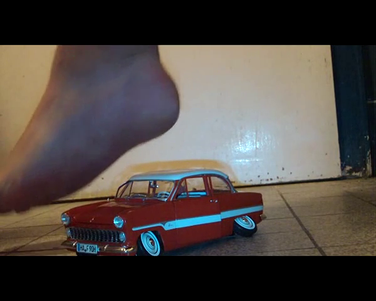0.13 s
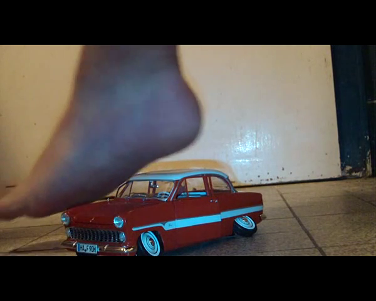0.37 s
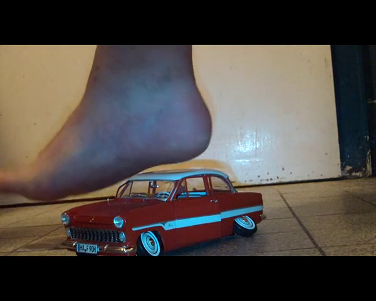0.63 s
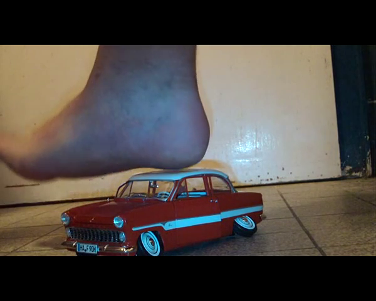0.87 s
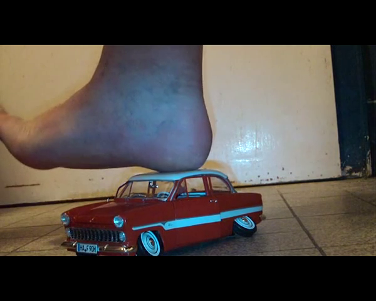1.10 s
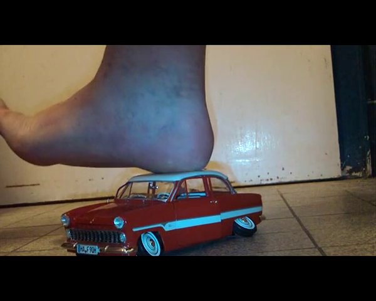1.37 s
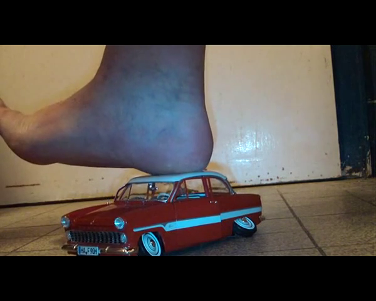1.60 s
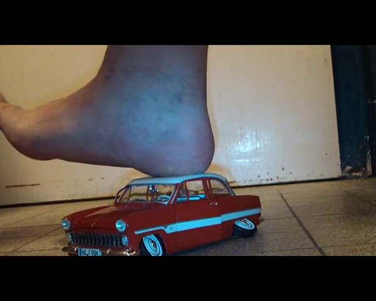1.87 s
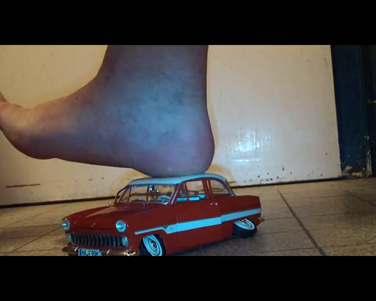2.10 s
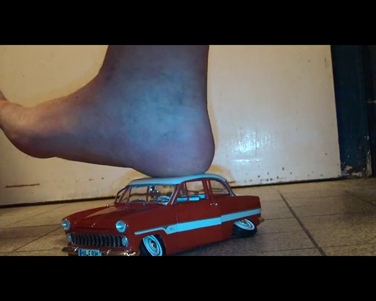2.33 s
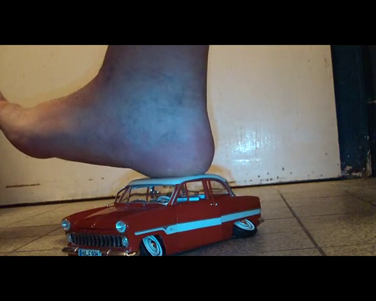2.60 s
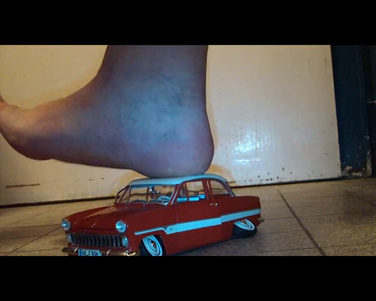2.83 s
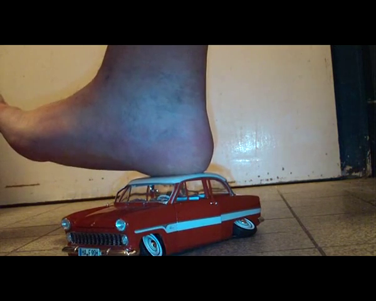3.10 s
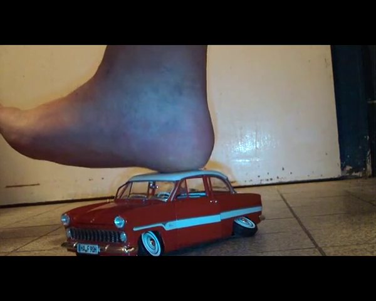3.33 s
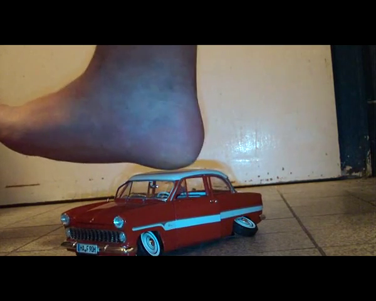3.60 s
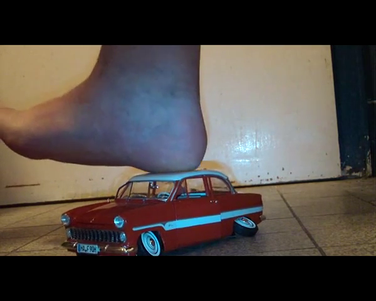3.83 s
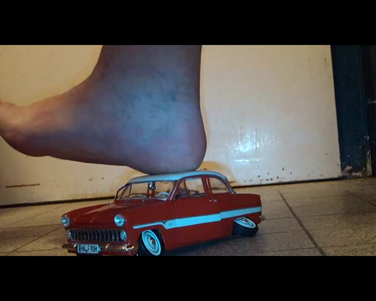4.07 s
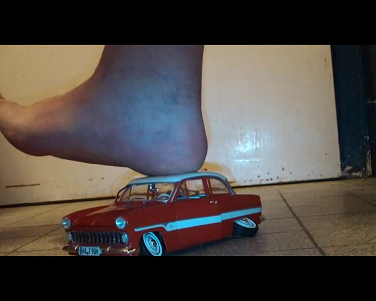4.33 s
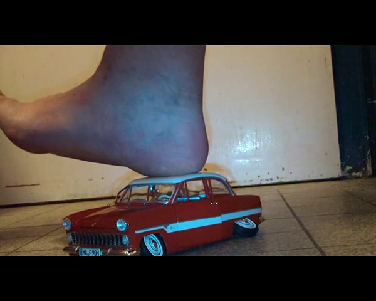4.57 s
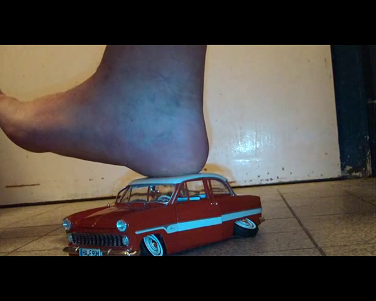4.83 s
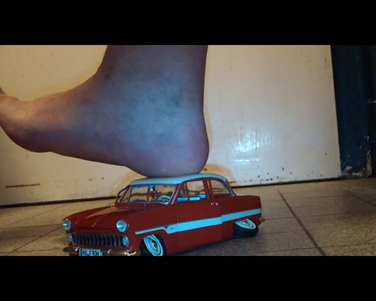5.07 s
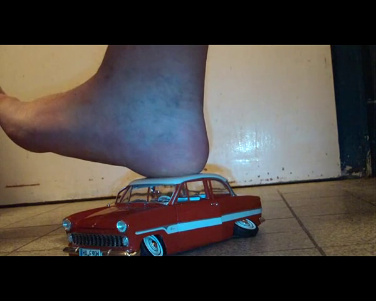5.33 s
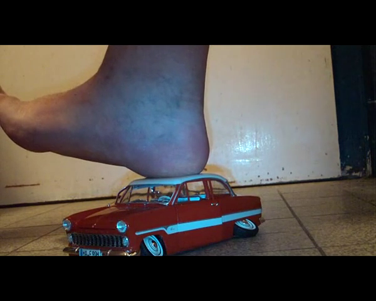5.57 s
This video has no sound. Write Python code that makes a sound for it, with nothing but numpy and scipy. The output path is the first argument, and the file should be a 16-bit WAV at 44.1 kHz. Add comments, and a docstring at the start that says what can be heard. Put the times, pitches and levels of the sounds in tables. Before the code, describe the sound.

Over faint rumble and hiss, a small metal toy car cracks sharply under a bare heel, with scattered ticks and creaky crackles between the louder snaps.

```python
"""A soft low rumble and hiss come first, filtered from noise, with a very faint steady whine.
After about a second, cracks begin: a bare heel presses on the roof of a die-cast toy car on a tiled floor,
close to a small microphone. Joints slip in bursts of tiny breaks that ring the hollow shell.
The small hard room answers with echoes and a short tail.
Some of the louder cracks also push the microphone's baseline off for a moment."""
import sys
import numpy as np
from scipy import signal
from scipy.fft import rfft, irfft, next_fast_len
from scipy.io import wavfile
from scipy.ndimage import uniform_filter1d, map_coordinates

SR = 44100
rng = np.random.default_rng(int(sys.argv[2]) if len(sys.argv) > 2 else 0)


def generate_wav(sig):
    """Save sig (samples, or channels by samples) to the path in sys.argv[1] as 16-bit PCM at SR."""
    pcm = np.round(np.clip(np.atleast_2d(sig).T, -1, 1) * 32767).astype(np.int16)
    wavfile.write(sys.argv[1], SR, pcm)


def convert_level_to_amplitude(level_db):
    """Map a level in decibels to its linear amplitude factor."""
    exponent = np.asarray(level_db, float) / 20
    return 10 ** exponent


N = 250929  # length in samples

# how loud the background is over time: start_s, rumble_db (before it wavers), hiss_db (before it wavers)
FLOOR_LEVELS = [(0.0, -57, -59.5), (0.54, -59.5, -60.5), (1.0, -56.5, -61.5), (1.55, -58.5, -59.5),
                (1.921, -54, -58), (2.251, -58, -60.5), (5.69, -54.5, -58.5)]
# tone of the rumble, only its shape counts: pitch_hz, level_db
RUMBLE_COLOUR = [(12, -59), (20, -4.5), (57, 3), (76, -5), (107, -3), (145, -3.5), (316, -7.5),
                 (600, -12.5), (780, -48.5), (1320, -120)]
# tone of the hiss, only its shape counts: pitch_hz, level_db
HISS_COLOUR = [(240, -50.5), (400, -14.5), (490, -20), (654, -6), (2500, -13), (3060, -12.5), (7000, -15),
               (9100, -32.5), (15400, -120)]
# one electrical whine: pitch_hz, level_db (rms)
WHINE_TONE = (7854, -93)
# every slip of a joint, and the rattles as the car rocks just after the first crack (1.012, 1.025, 1.039 s):
# start_s, strength_db (before a boost shared by all), part_hz and part_db (ring of the part that gives way),
# brightness_db, slip_ms
CRACK_LIST = [(0.986, -17.5, 3020, -17, 0, 3.1), (.987, 1, 778, 4, 14, 11), (1.012, -17, 800, 17, -12, 3.9),
              (1.025, -23, 800, 1, 4.5, 6.6), (1.039, -20, 888, 11.5, -9, 4.3),
              (1.651, -28.5, 902, -5, -9, 8.1), (1.668, -26, 920, -1, 2, 5.7),
              (1.728, -28, 1030, 1, -7, 9.5), (1.829, -14, 3400, -7, 11, 6.6),
              (1.841, -12, 1503, 2, 3, 4.2), (1.898, 0.5, 1163, -5.5, 4, 3),
              (2.387, -31, 3200, -8.5, 14.5, 7.5), (2.661, -5.5, 2720, 3, 2.5, 3.95),
              (3.171, -39.5, 1410, 3.5, 11, 34), (3.267, -37.5, 1123, 5, -21.5, 8),
              (3.285, -2.5, 3260, -2, 4.5, 2.73), (3.382, -11, 400, 14, 0, 11.3),
              (3.837, -30, 1350, 4, 5.5, 7.2), (4.084, -36, 970, 6, -6.5, 7.2),
              (4.193, -23, 1015, 0, -2, 7.8), (4.266, -28, 1100, -1, -9, 6.8),
              (4.338, -28, 1010, -5, -9.5, 9), (4.47, -27, 1120, 10, -1, 11.8),
              (4.495, -9.5, 990, -9, -7, 4.1), (5.168, -38, 4740, -12, 6, 34),
              (5.627, -3.5, 1910, -9, 3, 3.1)]
# ways the car's shell can ring: pitch_hz, level_db (before scatter), t60_s (time to fall by 60 dB)
SHELL_MODES = [(400, 3, 0.013), (554, -11, 0.063), (694, 0.5, 0.018), (767, -12, 0.079), (814, -7.5, 0.069),
               (995.5, -2.5, 0.04), (1285, 3, 0.013), (1440, 1.5, 0.017), (1887, -0.5, 0.011),
               (3360, -17, 0.0024), (2720, -3, 0.005), (3760, -4, 0.0085), (4393, -1.5, 0.0069),
               (5483, 6.5, 0.0067)]
# tone of a crack of strength 0 dB and brightness 0 dB: pitch_hz, level_db,
# gain_per_brightness (dB for each dB), gain_per_strength (dB for each dB)
CRACK_COLOUR = [(224, -42.5, 0.16, -0.1), (414, -31, -0.34, 1.02), (800, -10.5, 0.29, 0.65),
                (1540, -10, 0.63, 0.49), (3200, -12.5, 1.17, 0.37), (4256, -18, 1.03, 0.65),
                (6000, -24, 1.87, 0.42)]
# first echoes: delay_ms, level_db (before the treble loss)
WALL_ECHOES = [(4.5, -3.5), (9.6, -7.5), (22, -10.5)]
# how the room dies away in each band: pitch_hz, t60_s, level_db
ROOM_BANDS = [(316, 0.22, 7.5), (790, 0.3, 3), (1380, 0.29, -7), (2010, 0.28, -7), (3757, 0.29, -4),
              (5476, .26, -2.5)]
# pushes on the baseline: start_s, depth_share (of full scale, before smoothing), recovery_ms
JOLT_LIST = [(0.989, -0.11, 52), (1.835, 0.029, 44), (1.9, -0.091, 34), (3.285, -0.057, 21),
             (3.386, -0.022, 41), (4.499, 0.026, 43), (5.631, -0.051, 54)]
# upper limit of the microphone: pitch_hz, level_db
MIC_LIMIT = [(6800, 3), (7200, -9), (7500, -25), (8000, -33.5), (9000, -66)]


def unit(x):
    """Scale x to an rms of 1."""
    return x / np.sqrt(np.mean(x ** 2) + 1e-20)


def along(at, values, hz):
    """Join points with straight lines on a logarithmic pitch axis."""
    return np.interp(np.log(hz + 1), np.log(np.asarray(at) + 1), values)


def coloured(x, at, db):
    """Filter x to the given levels without letting any sound arrive early (minimum phase)."""
    size = next_fast_len(len(x) + 4096)
    level_db = along(at, db, np.fft.rfftfreq(size, 1 / SR))
    cepstrum = irfft(np.log(convert_level_to_amplitude(level_db)), size)
    # folding the second half onto the first makes the filter causal
    cepstrum[1:size // 2] *= 2
    cepstrum[size // 2 + 1:] = 0
    response = np.exp(rfft(cepstrum))
    return irfft(rfft(x, size) * response, size)[:len(x)]


def wobble(rate_hz):
    """A smooth random curve through rate_hz random points a second."""
    points = rng.standard_normal(int(N * rate_hz / SR) + 4)
    return map_coordinates(points, [np.arange(N) * rate_hz / SR])


def floor():
    """Low room rumble and microphone hiss: filtered noise whose levels follow a table and waver."""
    start_s, rumble_db, hiss_db = np.transpose(FLOOR_LEVELS)
    t = np.arange(N) / SR
    rumble = unit(coloured(rng.standard_normal(N), *np.transpose(RUMBLE_COLOUR)))
    hiss = unit(coloured(rng.standard_normal(N), *np.transpose(HISS_COLOUR)))
    rumble *= convert_level_to_amplitude(np.interp(t, start_s, rumble_db) + wobble(10))
    hiss *= convert_level_to_amplitude(np.interp(t, start_s, hiss_db) + 0.89 * wobble(2.4))
    return rumble + hiss


def electrical_whine():
    """A faint steady sine tone."""
    pitch_hz, level_db = WHINE_TONE
    t = np.arange(N) / SR
    return np.sqrt(2) * convert_level_to_amplitude(level_db) * np.sin(2 * np.pi * pitch_hz * t)


def cracks():
    """Each slip of a joint, or rattle of the rocking car, rings the shell, and the room answers with echoes and
    a tail."""
    out = np.zeros(N + SR)
    t = np.arange(SR // 8) / SR
    echoes = wall_echoes()
    for start_s, strength_db, part_hz, part_db, bright_db, slip_ms in CRACK_LIST:
        burst = slip_burst(slip_ms, t)
        body = shell_body(strength_db, part_hz, part_db, bright_db, t)
        blow = signal.fftconvolve(burst, body)[:len(t)]
        near = signal.fftconvolve(blow / np.linalg.norm(blow), echoes)
        # the room mixes all directions, so it keeps the shell's colour but not the burst's pattern
        tail = room_tail(rise_ms=0.53, tail_db=4.0)
        far = signal.fftconvolve(body / np.linalg.norm(body), tail)
        near_at = round(start_s * SR)
        far_at = round((start_s + slip_ms / 2000) * SR)  # half a slip length later
        out[near_at:][:len(near)] += convert_level_to_amplitude(strength_db + 12.5) * near
        out[far_at:][:len(far)] += convert_level_to_amplitude(strength_db + 9) * far
    return out[:N]


def slip_burst(slip_ms, t):
    """A burst of tiny uneven breaks that sets in fast, holds and lets go."""
    onset_share = 0.15  # rise time over slip length
    length_ms = max(slip_ms, 0.5)
    rise = 1 - np.exp(-t * 1000 / (onset_share * length_ms))
    slip = rise * np.exp(-(t * 1000 / length_ms) ** 2)
    unevenness = convert_level_to_amplitude(2.1 * rng.standard_normal(len(t)))
    spectrum = rfft(rng.standard_normal(len(t)) * unevenness * slip)
    # equal strength at every pitch, so the burst favours none
    return irfft(spectrum / abs(spectrum), len(t)) * np.sqrt(slip)


def shell_body(strength_db, part_hz, part_db, bright_db, t):
    """The shell and the part that gives way ring together, with a tone set by strength and brightness."""
    scatter_db, part_cycles = 3.5, 19  # part_cycles: cycles until the part has fallen by 60 dB
    lift_db, lift_octaves = 4.5, 0.4  # boost around the part's pitch, and its reach to either side
    # every crack weighs the shell's modes anew
    scatter = np.outer(rng.standard_normal(len(SHELL_MODES)), [0, scatter_db, 0])
    ring = ringing(SHELL_MODES + scatter, t)
    ring[1] += 30  # the snap itself: a broad click over the damped modes
    part = ringing([(part_hz, part_db, part_cycles / part_hz)], t)
    at, plain_db, per_brightness, per_strength = np.transpose(CRACK_COLOUR)
    hz = np.geomspace(150, 8000, num=40)
    colour_db = along(at, plain_db + per_brightness * bright_db + per_strength * strength_db, hz)
    colour_db += lift_db * np.exp(-(np.log2(hz / part_hz) / lift_octaves) ** 2)
    return coloured(ring + part, hz, colour_db)


def ringing(modes, t):
    """Add up sine tones that die away, from rows of pitch_hz, level_db, t60_s."""
    hz, db, t60 = np.reshape(modes, (-1, 3)).T[:, :, None]
    return np.sum(convert_level_to_amplitude(db - 60 * t / t60) * np.sin(2 * np.pi * hz * t), axis=0)


def wall_echoes():
    """The direct sound and its first echoes; walls and furniture swallow treble from the echoes."""
    echoes = np.zeros(SR // 30)
    echoes[0] = 1  # direct sound
    for delay_ms, level_db in WALL_ECHOES:
        echoes[round(delay_ms * SR / 1000)] = convert_level_to_amplitude(level_db)
    echoes[1:] = coloured(echoes[1:], [1500, 5000], [0, -9])
    return echoes


def room_tail(rise_ms, tail_db):
    """A noise-like tail of many blurred echoes that builds up, then dies away band by band."""
    at, t60, band_db = np.transpose(ROOM_BANDS)
    hz, t, bands = signal.stft(rng.standard_normal(SR // 2), SR, nperseg=256)
    fade = convert_level_to_amplitude(-60 * t / along(at, t60, hz)[:, None])
    tail = signal.istft(bands * fade, SR, nperseg=256)[1][:SR // 2]
    ms = np.arange(len(tail)) / SR * 1000
    tail *= 1 - np.exp(-ms / rise_ms)
    return convert_level_to_amplitude(tail_db) * coloured(tail / np.linalg.norm(tail), at, band_db)


def jolts():
    """The baseline jumps and creeps back; the coupling capacitor makes it overshoot."""
    t = np.arange(N) / SR
    push = np.zeros(N)
    for start_s, depth, recovery_ms in JOLT_LIST:
        progress = (t - start_s) * 1000 / recovery_ms
        push += depth * (progress >= 0) * np.clip(1 - progress ** 2, 0, 1)
    capacitor_s = 0.042  # time constant
    keep = np.exp(-1 / (capacitor_s * SR))
    return signal.lfilter([1, -1], [1, -keep], uniform_filter1d(push, size=60))


def scene():
    """Background, cracks and jolts pass the microphone's upper limit; the whine is added after it."""
    heard = floor() + cracks() + jolts()
    return (coloured(heard, *np.transpose(MIC_LIMIT)) + electrical_whine())[None]


def roll_off(x):
    """The treble ends steeply here."""
    return signal.sosfilt(signal.butter(12, 9400, fs=SR, output="sos"), x)


def record(dry):
    """Peaks beyond full scale are cut flat."""
    mix = np.clip(dry, -1, 1)
    return roll_off(mix)


dry = scene()
out = record(dry)
generate_wav(out)
```